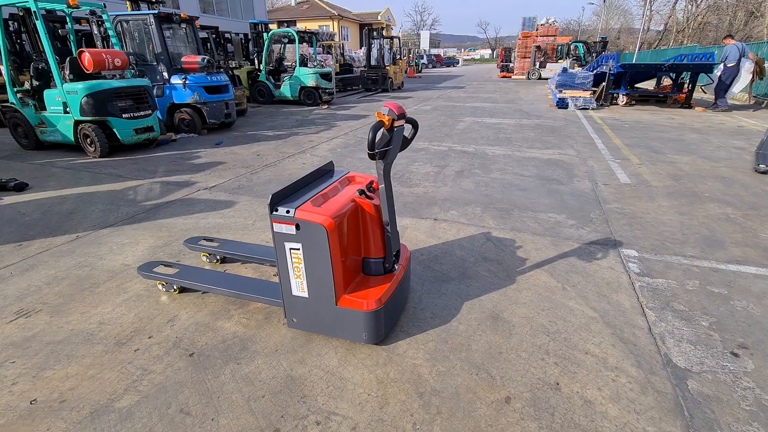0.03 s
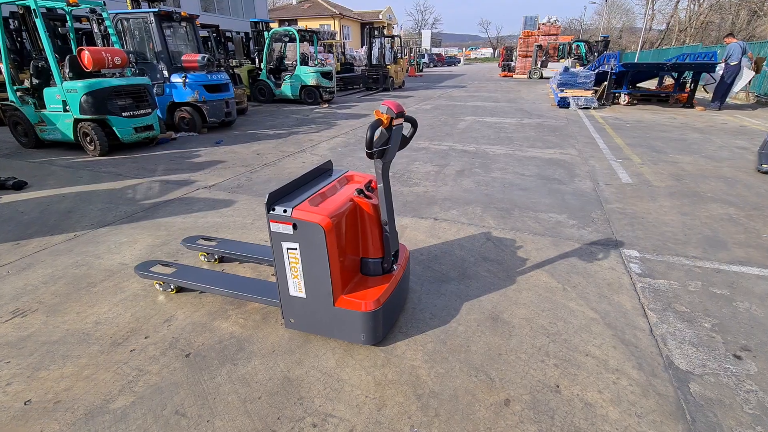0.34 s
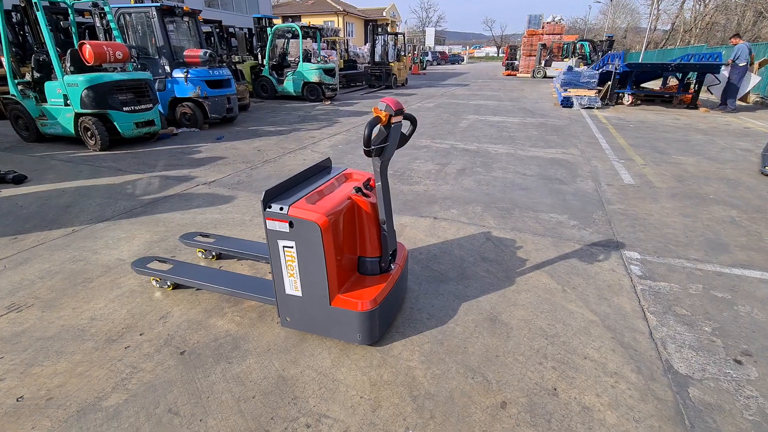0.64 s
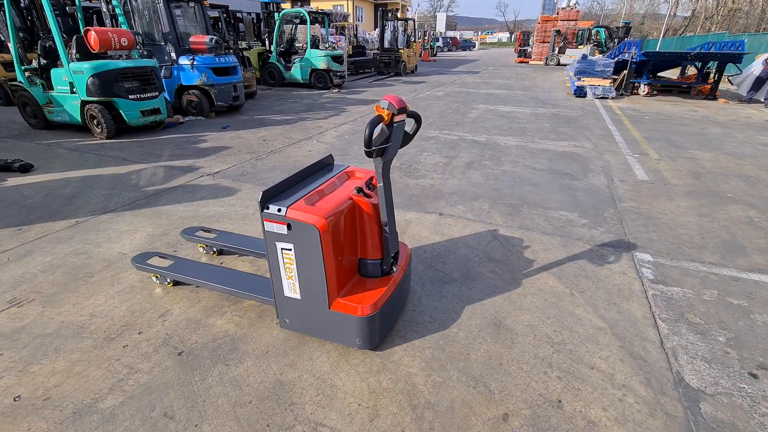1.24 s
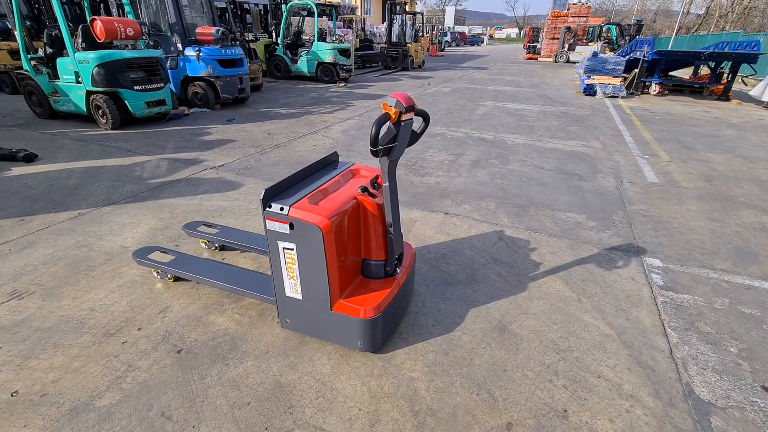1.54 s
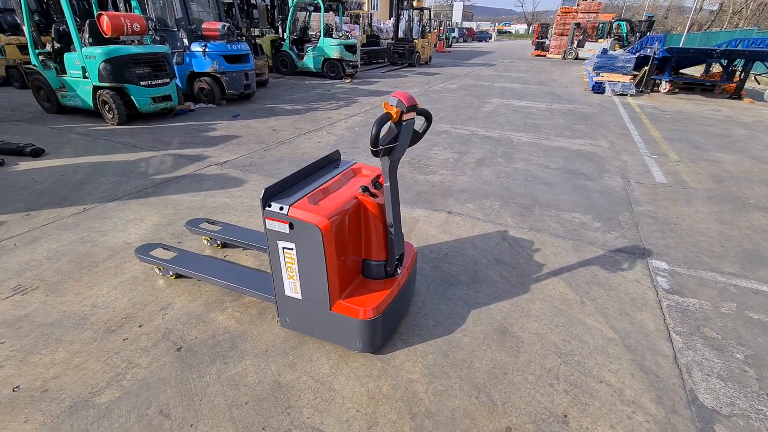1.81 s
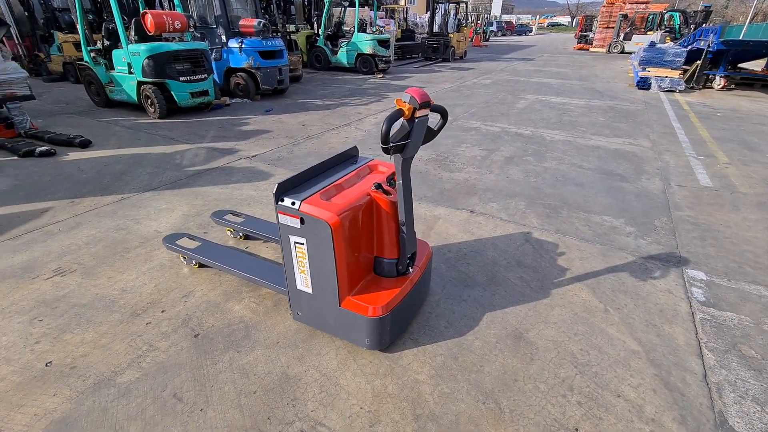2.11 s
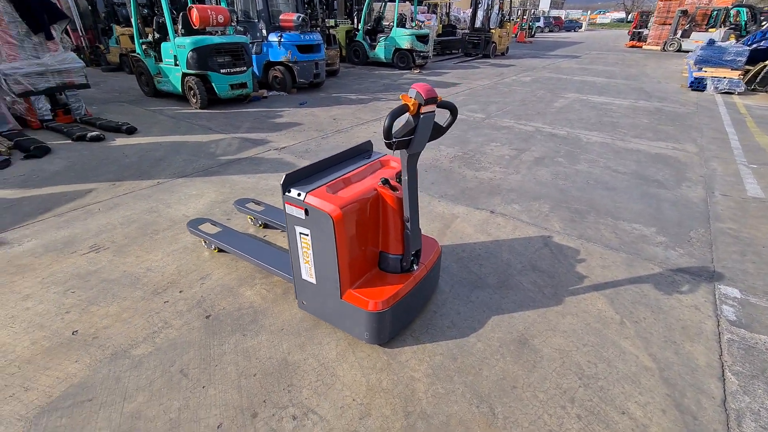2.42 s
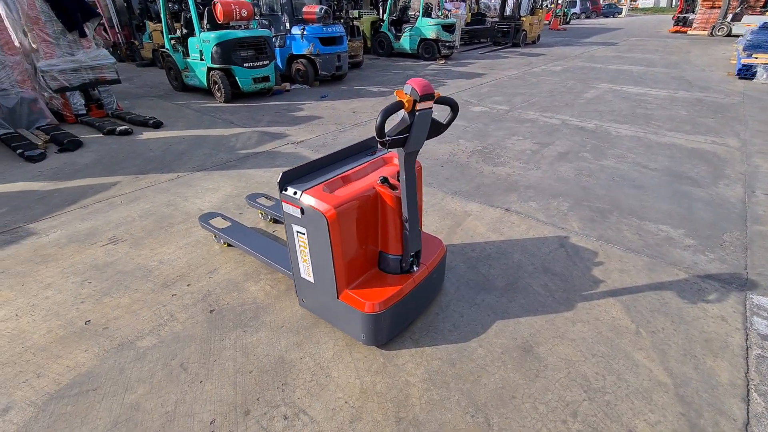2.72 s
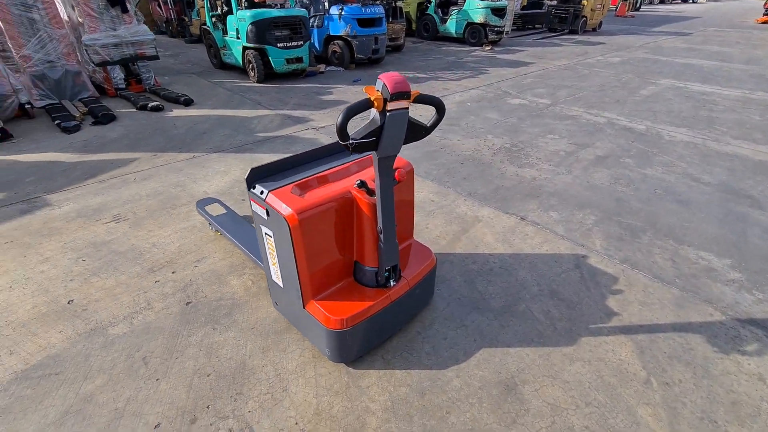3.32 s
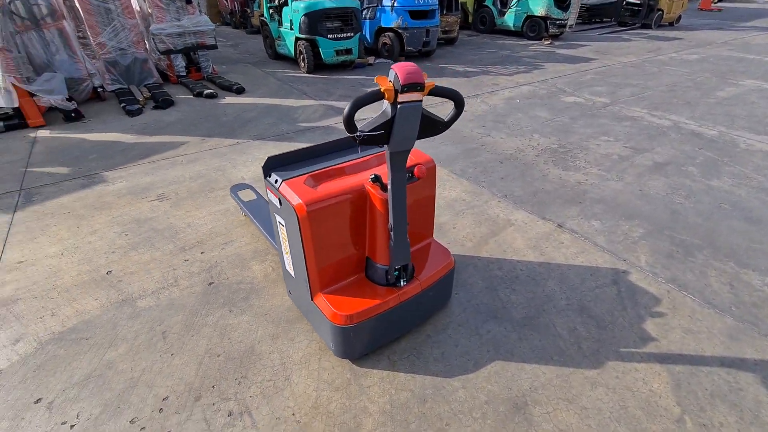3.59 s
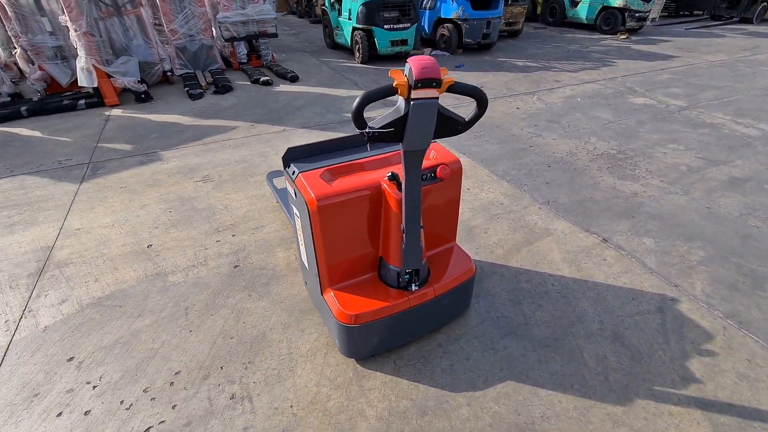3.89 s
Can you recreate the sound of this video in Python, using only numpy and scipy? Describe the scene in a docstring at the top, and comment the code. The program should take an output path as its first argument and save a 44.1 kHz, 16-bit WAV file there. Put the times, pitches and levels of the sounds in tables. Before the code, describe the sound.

Three ringing metal clanks in an open yard, with shoe scuffs and wind rumble.

```python
"""An open concrete yard, with a low rumble of wind and a droning hum near 54 Hz.
Metal gear is handled: a hollow body clunks, then three sharp clanks about a second apart
ring and echo around the yard. Someone holding a camera steps sideways, shoes scuffing on grit;
at the end the camera is bumped and a small loose part rattles."""
import sys
import numpy as np
from scipy import signal
from scipy.fft import rfft, irfft, next_fast_len
from scipy.io import wavfile
from scipy.ndimage import map_coordinates

SR = 44100
rng = np.random.default_rng(int(sys.argv[2]) if len(sys.argv) > 2 else 0)


def bounce(signal):
    """Save signal as a 16-bit WAV file at the path given by the first command-line argument."""
    frames = np.transpose(np.atleast_2d(signal))
    limited = np.clip(frames, -1, 1)
    pcm = np.round(limited * 32767).astype(np.int16)
    wavfile.write(sys.argv[1], SR, pcm)


N = 174195


def amp(db):
    """Decibels to gain."""
    return 10 ** (np.asarray(db) / 20)


def unit(x):
    """Scale to rms 1."""
    return x / np.sqrt(np.mean(x ** 2) + 1e-20)


def along(points, hz):
    """Interpolate (Hz, value) points on a log axis."""
    freqs, values = np.transpose(points)
    return np.interp(np.log(hz + 1), np.log(freqs + 1), values)


def clock(size=N):
    """Sample times in seconds."""
    return np.arange(size) / SR


def curves(rows):
    """One value per sample for each column after the time."""
    times, *columns = np.transpose(rows)
    return [np.interp(clock(), times, column) for column in columns]


def wobble(rate_hz, size=N):
    """Smooth random curve, rate_hz knots a second."""
    return map_coordinates(rng.standard_normal(4096), [clock(size) * rate_hz], mode="wrap")


def filtered(x, response):
    """Apply a complex frequency response."""
    size = x.shape[-1]
    padded = next_fast_len(size + 8192)
    hz = np.fft.rfftfreq(padded, 1 / SR)
    return irfft(rfft(x, padded) * response(hz), padded)[..., :size]


# Each row: frequency in Hz, left-right correlation.
CORRELATION = [(50, 0.45), (130, 1), (250, 0.87), (1200, 0.71), (3000, 0.32), (7000, 0.26), (14000, 0.17)]
def noise(colour, size=N, tilt_db_oct=0):
    """Coloured stereo noise of rms 1, partly alike on both sides."""
    def mid_side_gains(hz):
        angle = np.arccos(np.clip(along(CORRELATION, hz), -1, 1)) / 2
        gain = amp(along(colour, hz) + tilt_db_oct * np.log2(hz + 1))
        return gain * [np.cos(angle), np.sin(angle)]
    mid, side = filtered(rng.standard_normal((2, size)), mid_side_gains)
    return unit(np.array([mid + side, mid - side]))


def decayed(x, t60_by_hz):
    """Fade each frequency with its own T60."""
    hz, t, spectrum = signal.stft(x, SR, nperseg=256)
    fade = amp(-60 * t / along(t60_by_hz, hz)[:, None])
    return signal.istft(spectrum * fade, SR, nperseg=256)[1][:, :x.shape[1]]


def ring(modes, t, blur_rad, scatter_db=1.5, spread_rad=0.34):
    """Damped tones; strength varies by blow, and the phase blurs differently on each side."""
    out = 0
    for hz, db, t60_s in modes:
        spread = spread_rad * np.array([[1], [-1]]) * wobble(46.8, len(t))
        phase = 2 * np.pi * (hz * t + rng.random()) + blur_rad * wobble(65.4, len(t)) + spread
        out = out + amp(db + scatter_db * rng.normal() - 60 * t / t60_s) * np.sin(phase)
    return np.sqrt(2) * out


def add(track, start_s, x):
    """Mix x into track from start_s."""
    part = track[:, max(round(start_s * SR), 0):][:, :x.shape[-1]]
    part += x[..., :part.shape[1]]


# Each row: time in seconds, pitch in Hz, level in dB.
HUM_TRACK = [(0.1, 57.6, -41), (0.2, 57.3, -39.5), (0.46, 56.4, -42.5), (0.56, 54.57, -37),
             (1.25, 54.06, -43.5), (1.49, 53.46, -37.5), (1.71, 50.86, -45), (1.85, 51.9, -41),
             (2.99, 54.62, -37.5), (3.2, 49.52, -44), (3.49, 55.05, -39.5), (3.95, 54.26, -45)]
def hum(drift_rad=0.3, waver_db=1.5, octave_db=-23):
    """A low, wavering drone with a faint octave."""
    hz, db = curves(HUM_TRACK)
    phase = 2 * np.pi * np.cumsum(hz) / SR + drift_rad * wobble(12)
    level = np.sqrt(2) * amp(db + waver_db * wobble(14))
    return level * (np.sin(phase) + amp(octave_db) * np.sin(2 * phase + wobble(9)))


# Each row: frequency in Hz, gain in dB.
RUMBLE_COLOUR = [(20, -51), (35, 10), (52, 1), (70, 6.5), (100, 0.5), (135, -10), (250, -19), (500, -60.5)]
AIR_COLOUR = [(100, -15), (170, -2), (260, 1.5), (500, -2), (800, -2), (1300, -3), (2200, -7), (3500, -25),
              (7000, -31.5), (9000, -43), (15000, -63)]
def wind(rumble_db=-45, air_db=-54.5):
    """Wind rumbles under the steady wash of open air."""
    rumble = amp(rumble_db + 0.9 * wobble(5.35)) * noise(RUMBLE_COLOUR)
    air = amp(air_db + 0.6 * wobble(2.77)) * noise(AIR_COLOUR)
    return rumble + air


# Each row: start in seconds, level in dB, relative rattle in dB.
CLUNK_CONTACTS = [(0.103, -48, -14), (.376, -46, -7.5), (.391, -42.5, -3), (.424, -32, -23),
                  (.438, -44.5, 4)]
# Each row: frequency in Hz, level in dB, T60 in seconds.
BODY_MODES = [(338.3, -14.5, 0.6), (624, -31, 0.74), (724, -6, 0.29), (896, -4.5, .3), (887, -21, 1.2),
              (1135, 5.5, 0.055), (1304, -16.5, 0.7), (1327, 0.5, 0.13), (1370, -16, 0.57),
              (1809, -5.5, .13)]
# Each row: frequency in Hz, gain in dB.
BODY_COLOUR = [(150, -29), (500, -10.5), (750, -4.5), (1000, -10), (1280, 1.5), (1600, -12.5),
               (2500, -24.5), (5000, -46.5)]
def clunk(attack_s=0.002, knock_db=1, rattle_t60_s=0.19):
    """A hollow body is knocked a few times and loose parts rattle on it."""
    out, t = np.zeros((2, N)), clock(SR)
    for start_s, db, rattle_db in CLUNK_CONTACTS:
        body = ring(BODY_MODES, t, blur_rad=0.3)
        knock = amp(knock_db) * decayed(noise(BODY_COLOUR, SR), t60_by_hz=[(300, 0.24), (1500, 0.3)])
        rattle = amp(rattle_db - 60 * t / rattle_t60_s) * noise(SCRAPE_COLOUR, SR)
        attack = 1 - np.exp(-t / attack_s)
        add(out, start_s, amp(db) * attack * (body + knock + rattle))
    return out


# Each row: peak in seconds, level in dB, frequency in Hz, half-width in seconds.
FOOTFALLS = [(0.599, -23, 55, .022), (2.123, -49, 234, 0.028), (2.272, -34, 59, 0.027)]
def footfalls():
    """Feet land with soft, low thuds."""
    out = 0
    for peak_s, db, hz, width_s in FOOTFALLS:
        t = clock() - peak_s
        out = out + amp(db) * np.exp(-(t / width_s) ** 2) * np.cos(2 * np.pi * hz * t)
    return out


# Each row: peak, 10 dB rise and 20 dB fall in seconds, level in dB, relative grit in dB.
SHOE_STROKES = [(.962, 0.0071, 0.13, -53.5, -28), (1.594, 0.031, 0.08, -45.5, -7.5),
                (1.705, .03, 0.13, -59, 0), (1.902, 0.079, 0.41, -53.5, -13),
                (1.967, 0.018, .06, -48.5, -13), (2.104, 0.0074, 0.013, -47, -20),
                (2.217, 0.0013, 0.19, -44.5, -10), (2.38, .04, .05, -44, -10),
                (2.456, 0.028, 0.083, -47, -11.5), (2.566, 0.041, 0.092, -46, -7.5),
                (2.61, 0.032, 0.082, -56, 1.5), (2.846, 0.019, 0.074, -53.5, -8),
                (2.91, .008, 0.0296, -56, -16), (3, 0.01, 0.022, -56, -10), (3.137, 0.0095, 0.15, -52, -12),
                (3.205, 0.038, 0.12, -57, -7)]
# Each row: time in seconds, level of clothes and soles in dB.
RUSTLE_LEVEL = [(.3, -90), (.8, -70.5), (1.4, -58.5), (2.4, -60), (2.75, -61), (3.05, -69.5), (3.5, -64),
                (3.95, -69.5)]
# Each row: frequency in Hz, gain in dB.
SCRAPE_COLOUR = [(200, 3), (700, -1), (1400, 1), (2600, 3.5), (3800, -0.5), (5200, -0.5), (7200, -6.5),
                 (9000, -29.5), (15000, -61)]
GRIT_COLOUR = [(2000, -22), (6500, 1), (9000, -5), (12000, -4.5), (15000, -1)]
def scuffs(sole_grain_db=2.6, grit_grain_db=4.5):
    """Soles scrape over gritty concrete above a faint rustle of clothes."""
    sole_power, grit_power = amp(curves(RUSTLE_LEVEL)[0]) ** 2, 0
    for peak_s, rise_s, fall_s, db, grit_db in SHOE_STROKES:
        t = clock() - peak_s
        stroke = amp(db - np.where(t < 0, 10 * (t / rise_s) ** 2, 20 * t / fall_s))
        sole_power += stroke ** 2
        grit_power += (stroke * amp(grit_db)) ** 2
    grains = wobble(600)
    sole = unit(amp(sole_grain_db * grains) * noise(SCRAPE_COLOUR))
    grit = unit(amp(grit_grain_db * grains) * noise(GRIT_COLOUR))
    return np.sqrt(sole_power) * sole + np.sqrt(grit_power) * grit


# Each row: time in seconds, level in dB.
RUB_LEVEL = [(.3, -98), (1.1, -63), (1.6, -59.5), (2.05, -61), (2.3, -56), (2.6, -51), (2.8, -66.5),
             (3.95, -64)]
# Each row: frequency in Hz, gain in dB.
RUB_COLOUR = [(70, -22), (160, 6.5), (260, -0.5), (420, -2.5), (800, -30.5)]
def hand_rub(flutter_db=2.7):
    """A hand rubs dully on the camera."""
    return amp(curves(RUB_LEVEL)[0] + flutter_db * wobble(25.3)) * noise(RUB_COLOUR)


# Each row: start in seconds, level in dB, tilt in dB per octave, relative low ring and echo in dB,
# one extra partial in Hz, its relative level in dB.
CLANK_CONTACTS = [(1.203, -29, 1.5, -4.5, -1, 2976, -7.5), (1.2145, -22, -0.1, -5, -4.5, 4516, -11),
                  (1.229, -25, 1.2, -9.5, -4, 1545, -11), (1.243, -29, -1, -13, -2.5, 2286, -3.5),
                  (2.2758, -26, -0.5, -14.5, -1, 2810, -16), (2.283, -39, -4, -30, -6, 1825, -4),
                  (3.358, -39.5, 1.5, -12, 5.5, 5177, -1), (3.365, -41.5, -2.5, -10, 4, 2570, -10)]
# Each row: frequency in Hz, level in dB, T60 in seconds.
LOW_MODES = [(664.5, -15.5, 0.96), (741, -6.5, 0.21)]
BRIGHT_MODES = [(1208, -27.5, 0.82), (1990, -31, 0.49), (2524, -31, 0.5), (2653, -14, 0.1),
                (2876, -28, 0.1), (3160, -14, 0.19), (3270, -20, 0.21), (3475, -9.5, 0.093),
                (3710, -25.5, 0.24), (4342, -23, .2), (4753, -13, 0.24), (7000, -22, 0.15)]
RECORDER_SIZZLE_TONES = [(13560, -18, 0.26), (14250, -27, 0.28), (14750, -19, .25)]
# Each row: frequency in Hz, gain in dB.
CLANK_COLOUR = [(200, -14), (520, -29), (950, -14.5), (1200, -5.5), (2000, -2.5), (3100, 0.5), (4000, -3),
                (5000, -3), (7000, -7.5), (8800, -20.5), (12500, -29), (14500, -45), (16000, -18)]
# Each row: frequency in Hz, T60 in seconds.
ECHO_DECAY = [(500, 0.81), (2000, 0.43), (4000, 0.29), (8000, 0.28), (14000, 0.25)]
def clanks(attack_s=0.001, crack_db=1, crack_t60_s=0.16, bright_db=3.5, sizzle_rise_s=0.0087):
    """Metal strikes metal: a crack, ringing modes and a dense echo from the yard.
    A thin, high sizzle from the recorder follows each clank."""
    out, t = np.zeros((2, N)), clock(SR // 2)
    for start_s, db, tilt_db_oct, low_db, echo_db, partial_hz, partial_db in CLANK_CONTACTS:
        crack_level = amp(crack_db - 60 * t / crack_t60_s + 1.5 * wobble(330, len(t)))
        crack = crack_level * noise(CLANK_COLOUR, len(t), tilt_db_oct)
        echo = amp(echo_db) * decayed(noise(CLANK_COLOUR, len(t), tilt_db_oct), ECHO_DECAY)
        modes = BRIGHT_MODES + [(partial_hz, partial_db, 0.28)]
        bright = amp(bright_db) * ring(modes, t, blur_rad=0.42)
        low = amp(low_db) * ring(LOW_MODES, t, blur_rad=0.7)
        sizzle = (1 - np.exp(-t / sizzle_rise_s)) * ring(RECORDER_SIZZLE_TONES, t, blur_rad=1.8)
        attack = 1 - np.exp(-t / attack_s)
        add(out, start_s, amp(db) * attack * (crack + echo + bright + low + sizzle))
    return out


def bump(start_s=3.667, db=-23.5, hz=874, t60_s=0.0056):
    """One dry finger tap on the camera body."""
    t = np.maximum(clock() - start_s, 0)
    return amp(db - 60 * t / t60_s) * np.sin(2 * np.pi * hz * t)


# Each row: start in seconds, level in dB.
BOUNCES = [(3.686, -39), (3.704, -44.5), (3.713, -44), (3.74, -46.5), (3.759, -55)]
# Each row: frequency in Hz, gain in dB.
CLICK_COLOUR = [(900, -7.5), (1550, -8), (2000, 5), (2300, -11), (2750, 4.5), (3200, -9.5), (3900, -14),
                (4750, 1), (5300, -8), (5850, -2.5), (7500, -13), (9000, -28.5), (15000, -32)]
def loose_part(t60_s=0.12):
    """A small loose part clicks as it bounces."""
    out, t = np.zeros((2, N)), clock(SR // 4)
    for start_s, db in BOUNCES:
        add(out, start_s, amp(db - 60 * t / t60_s) * noise(CLICK_COLOUR, len(t)))
    return out


# Each row: frequency in Hz, left minus right in dB.
BALANCE = [(50, -1.8), (300, -.5), (1200, -1.5), (2000, -5), (5500, -4), (7000, -3.5), (8000, 7),
           (10000, -5.5), (14000, -9)]
def scene(left_lag_s=0.000297):
    """All sources at two microphones; the left is later and mostly weaker."""
    mix = hum() + wind() + clunk() + footfalls() + scuffs() + hand_rub()
    mix += clanks() + bump() + loose_part()
    side = np.array([[0.5], [-0.5]])
    def placement(hz):
        return amp(side * along(BALANCE, hz)) * np.exp(-2j * np.pi * hz * side * left_lag_s)
    return filtered(mix, placement)


def record(dry, silence_s=0.107, fade_s=0.013, top_hz=16100):
    """Fade in after a short silence, then low-pass."""
    fade_in = np.clip((clock() - silence_s) / fade_s, 0, 1)
    return filtered(dry * fade_in, lambda hz: np.clip((top_hz - hz) / 500, 0, 1))


dry = scene()
out = record(dry)
bounce(out)
```